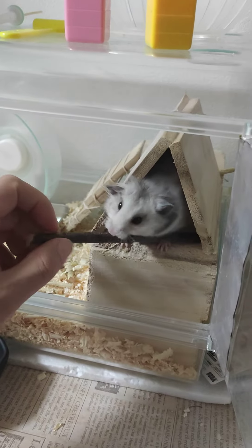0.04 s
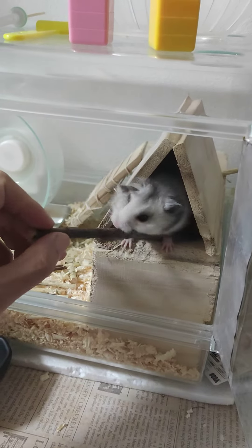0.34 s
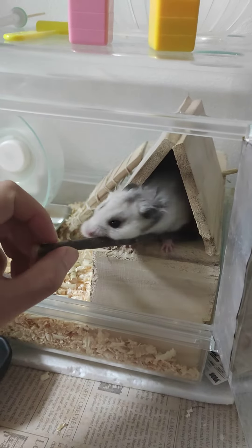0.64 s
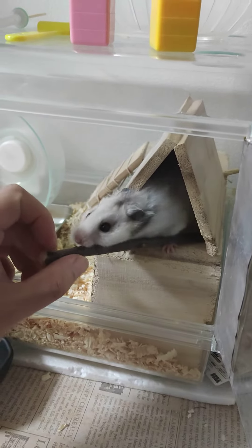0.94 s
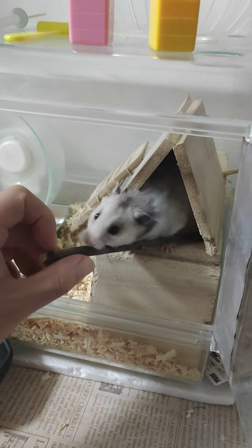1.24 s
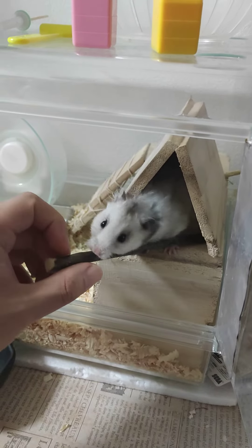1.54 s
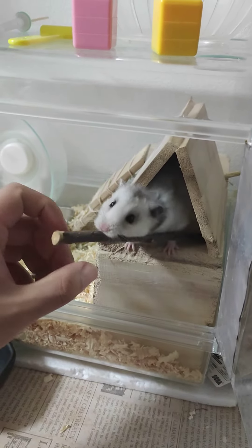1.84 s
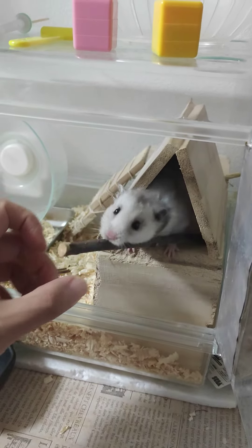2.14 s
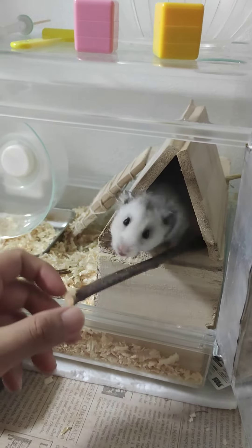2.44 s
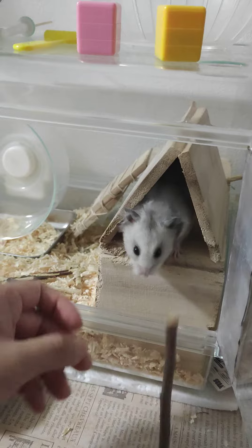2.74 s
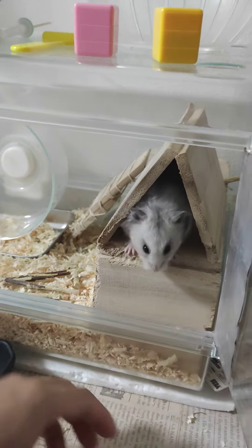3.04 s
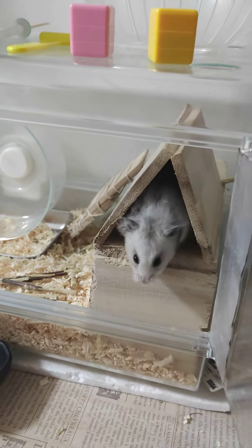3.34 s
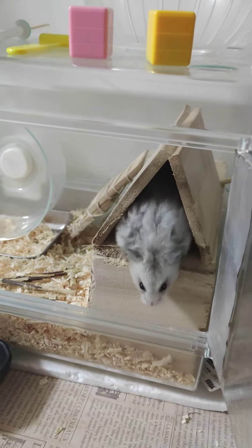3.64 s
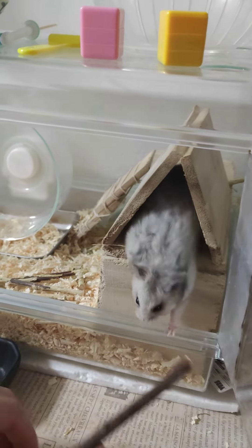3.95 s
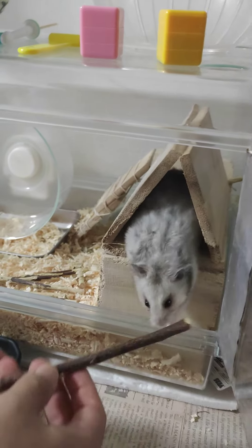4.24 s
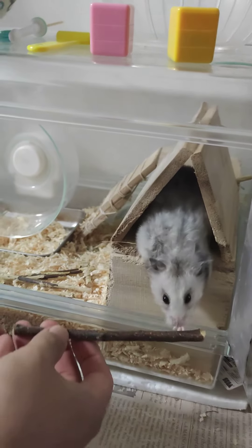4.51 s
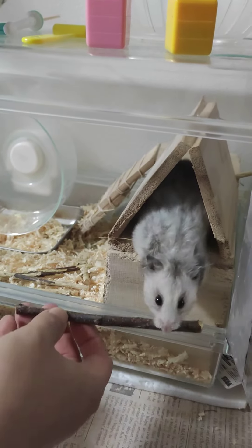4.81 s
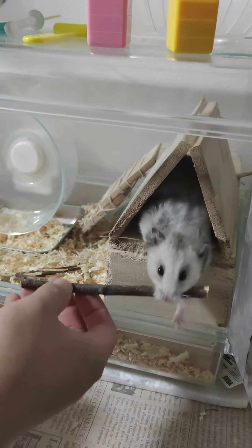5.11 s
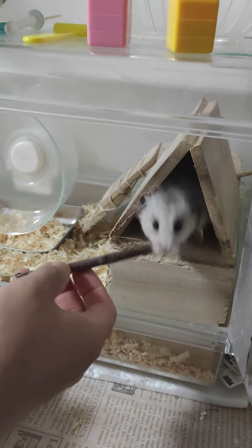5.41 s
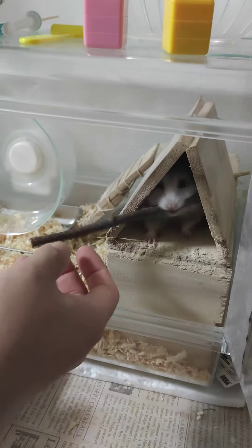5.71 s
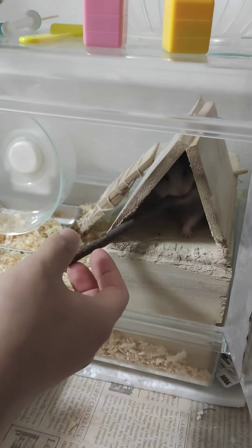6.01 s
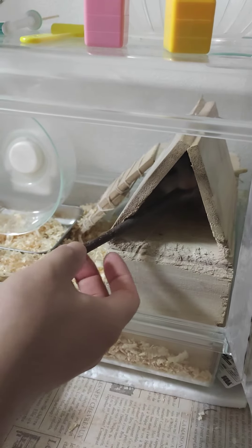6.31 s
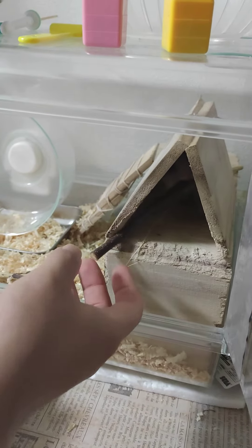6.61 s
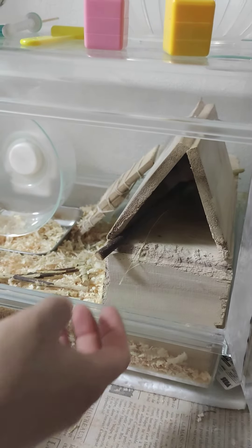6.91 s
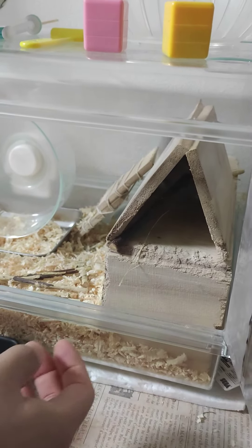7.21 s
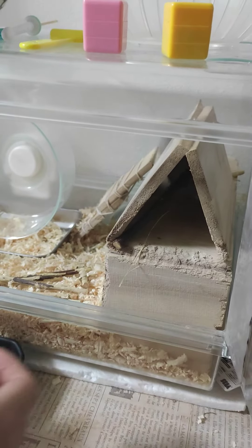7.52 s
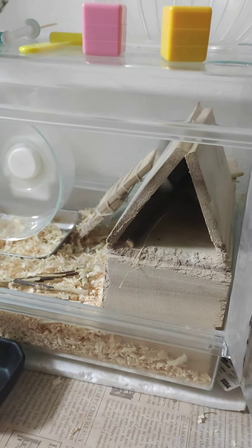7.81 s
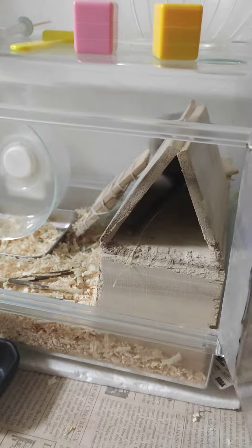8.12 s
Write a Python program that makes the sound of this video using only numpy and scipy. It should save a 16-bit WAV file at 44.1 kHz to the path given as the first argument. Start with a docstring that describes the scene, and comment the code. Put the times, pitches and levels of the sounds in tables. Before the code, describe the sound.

In a quiet room, a small stick clatters onto paper, then scrapes and bumps softly as a hamster pulls it over wood.

```python
"""A hamster and a twig

In a quiet room, close to a phone, a hand offers a twig to a hamster in a plastic cage. The twig drops
onto newspaper, ringing and slapping the paper as it bounces, then rolls to rest. The hamster drags it
into its wooden hut: bark catches and slips, and the boards hum and knock. Claws tick, shavings rustle,
and near the end a finger swishes over the phone's case."""
import sys
import numpy as np
from scipy import signal
from scipy.fft import rfft, irfft
from scipy.io import wavfile
from scipy.ndimage import uniform_filter1d

SR = 44100
rng = np.random.default_rng(int(sys.argv[2]) if len(sys.argv) > 2 else 0)


def to_wav(s):
    """Save 16-bit WAV."""
    ch = np.atleast_2d(s).T  # columns
    pcm = np.round(np.clip(ch, -1, 1) * 32767)  # PCM
    wavfile.write(sys.argv[1], SR, pcm.astype(np.int16))


N = 359856
HIT_SIZE = 16384  # samples set aside for one hit

# The twig's landings: t/s, level/dB, hardness/(dB per octave), bending/dB, floor thud/dB, ring/dB,
# contact spot along the twig (0-1), paper snap/dB. Hard ones are brighter; flat ones bend the twig.
BOUNCES = [(2.788, -11.5, 4, 11, -4, -16, 0.2, -28), (2.7944, -8, 1.7, 2, 3, -10, 0, -26),
           (2.802, -20.5, -1.5, -5, -3, -34, 0, -50), (2.8795, -15.5, -2, 2.5, -2.5, -26.5, 0.05, -37),
           (2.9291, -24, -5, 4.5, -6, -36, 0.18, -45), (3.1085, -9.5, -1.5, -11, -0.5, -20, 0.13, -29),
           (3.2005, -28.5, 0, -1.5, 1, -22.5, .305, -55), (3.299, -10, 2.5, 0, 5.5, -32, 0.36, -31),
           (3.341, -29.5, 4.5, 7, 13, -40, 0.2, -51), (3.3955, -23, 0.4, 3.5, 7, -23, 0.11, -49),
           (3.4358, -31, -1.5, 0, 2, -36.5, 0.21, -52), (3.484, -32, 0.5, -7, 5, -40, 0.1, -48),
           (3.505, -32.5, -5, 0, -3, -48, 0.4, -47), (3.539, -33.5, -6, -6, -5.5, -51, 0.35, -51),
           (3.545, -33, -4.5, 0, -4, -52, 0.2, -66), (3.573, -39.5, -3.5, 0, -2, -51, 0.4, -60),
           (3.595, -39.5, -7.5, -5, -8.5, -39, .17, -62), (3.631, -50, -7.5, -5, 0, -58, 0.2, -70),
           (3.664, -50.5, -5.5, 1, -1, -57, .17, -74)]
# The hamster's pulls: t/s, length/s, scrape/dB, hut rumble/dB, rasp f/Hz
PULLS = [(5.685, 0.08, -53, -57, 1190), (5.804, 0.033, -54, -56, 1250), (5.983, 0.055, -55, -56, 950),
         (6.04, 0.14, -50.5, -54, 800), (6.231, 0.16, -59.5, -58, 840), (6.56, 0.17, -56, -54.5, 770),
         (7.074, 0.16, -58.5, -61.5, 1044)]
HUT_MODES = [(150, 25, 6), (218, 27, 9.5), (318, 35, 10), (695, 55, 15), (765, 70, 11), (990, 50, 14),
             (1063, 60, 7.4), (2045, 68, 4.3), (2220, 280, 7.5), (4560, 600, 4.7), (8140, 840, 6.3)]  # pitches the hut rings at: f/Hz, width/Hz, boost/dB
TICK_COLOUR = [(300, -21), (1200, -7.5), (2400, -6), (4000, -6.5), (8000, -9), (11500, -19.5),
               (14000, -15.5)]  # tone of a small dry tick: f/Hz, level/dB
TICK_EDGES = [1500, 3300, 7500, 15500]  # borders of its clack, crack and fizz bands: f/Hz
# Left-right balance of sounds from the floor and from the cage: f/Hz, left minus right/dB
FLOOR_PAN = [(300, 0.5), (800, 3), (1400, 2), (2300, 10), (4500, -0.5), (9000, 4), (14000, 0)]
CAGE_PAN = [(60, 3), (110, -2), (200, 2.5), (380, -3), (700, 5), (1290, -7), (2380, 8), (4400, 0),
            (8120, 1), (15000, -0.5)]


def undb(db):
    """Turn decibels into a gain."""
    return 10 ** (np.asarray(db) / 20)


def unit(x):
    """Scale to an average strength (rms) of 1."""
    return x / np.sqrt(np.mean(x ** 2))


def mid_unit(x):
    """Scale a stereo pair so that its middle has rms 1."""
    return x / np.sqrt(np.mean(x.mean(0) ** 2))


def bins(size):
    """Frequencies in the spectrum of that many samples."""
    return np.maximum(np.fft.rfftfreq(size, 1 / SR), 1)


def over_hz(points, hz):
    """Read between (f/Hz, value) points, with octaves evenly spaced."""
    at, value = np.transpose(points)
    return np.interp(np.log(hz), np.log(at), value)


def colour(x, points, modes=()):
    """Give x a broad tone (f/Hz, level/dB) and modes, pitches that ring (f/Hz, width/Hz, boost/dB)."""
    size = x.shape[-1]
    hz = bins(size)
    peaks = 1 + sum((undb(db) ** 2 - 1) / (1 + (2 * (hz - f) / width) ** 2) for f, width, db in modes)
    log_gain = np.log(undb(over_hz(points, hz))) + np.log(np.maximum(peaks, .1)) / 2
    cepstrum = irfft(log_gain, size)
    cepstrum[1:size // 2] *= 2  # this folding puts the ringing after each push, not before
    cepstrum[size // 2 + 1:] = 0
    return irfft(rfft(x) * np.exp(rfft(cepstrum)), size)


def stereo(pair, pan, side=None):
    """Two unrelated signals become left and right; by default alike in the bass, apart in the treble."""
    near_side = [(120, -14), (300, -17.5), (600, -7), (1100, -2), (12000, 0)]  # stereo width of close sounds: f/Hz, side minus mid/dB
    size = pair.shape[-1]
    hz, sign = bins(size), np.array([[1], [-1]])
    mid, diff = rfft(pair)
    width = undb(over_hz(near_side if side is None else side, hz))
    return irfft((mid + sign * diff * width) * undb(sign * over_hz(pan, hz) / 2), size)


def lagged(pair, lag_s):
    """A sound from one side reaches the left microphone that much later than the right."""
    size = pair.shape[-1]
    return irfft(rfft(pair) * np.exp(-1j * np.pi * bins(size) * lag_s * np.array([[1], [-1]])), size)


def fading(t60s, size):
    """Dense echoes as two noises, each band dying at its own rate (f/Hz, time to fall 60 dB/s)."""
    t, hz = np.arange(size) / SR, bins(size)
    noise, out = rfft(rng.standard_normal((2, size))), 0
    centres = np.geomspace(100, 14000, 8)
    for centre, share in zip(centres, np.eye(len(centres))):
        band = irfft(noise * np.interp(np.log(hz), np.log(centres), share), size)
        envelope = np.exp(-np.log(1000) * t / over_hz(t60s, centre))
        out = out + band * envelope / np.linalg.norm(envelope)
    return out


def room(x, wet_db, delay_s=0.011):
    """Add the echo of the small room, whose furnishings soak up the highest treble."""
    ring_times = [(100, 0.29), (300, 0.33), (800, 0.19), (2200, 0.34), (5000, 0.1), (14000, 0.23)]  # the room's ring: f/Hz, time to fall 60 dB/s
    tail = np.pad(fading(ring_times, HIT_SIZE), ((0, 0), (int(delay_s * SR), 0)))
    tail = stereo(tail, [(100, 0.0095)])
    tail = colour(tail, [(200, -0.5), (700, -0.5), (2500, -3), (8000, -2.5), (13000, -12.5)])
    return x + undb(wet_db) * signal.fftconvolve(x, tail, axes=1)[:, :N]


def tilted(tone_db, edges, hardness, pivot_hz):
    """Band levels of one contact: the harder it is, the more they lean to the treble."""
    centres = np.sqrt(np.multiply(edges[:-1], edges[1:]))
    return np.array(tone_db) + hardness * np.log2(centres / pivot_hz)


def voiced(hit, edges, bands_db):
    """Nudge each band of a hit towards its level, counting its energy as spread over 10 ms."""
    hz = bins(HIT_SIZE)
    for _ in range(2):
        power = abs(rfft(hit.mean(0))) ** 2 * 2 / HIT_SIZE / (SR / 100)
        tone = [(np.sqrt(lo * hi), db - 10 * np.log10(power[(hz >= lo) & (hz < hi)].sum()))
                for lo, hi, db in zip(edges, edges[1:], bands_db)]
        hit = colour(hit, tone)
    return hit


def blows(table, edges, body, modes, pan, t60s, gain_db, scatter_db, attack_s,
          echo=0.8, lengthen=0, shift=0):
    """Each blow (t/s, level/dB, band levels/dB) rattles briefly and makes the body ring."""
    out, hz = np.zeros((2, N + HIT_SIZE)), bins(HIT_SIZE)
    loudest_db = max(row[1] for row in table)
    for s, level_db, bands_db in table:
        linger = undb(lengthen * (level_db - loudest_db))  # lighter blows can die sooner
        rattle = fading([(f, t60 * linger) for f, t60 in t60s], size=4096)
        rattle *= 1 - np.exp(-np.arange(4096) / (SR * attack_s))  # the soft surface gives way first
        burst = rfft(rattle, HIT_SIZE)
        # a contact pushes all pitches evenly: level the spectrum over 180 Hz spans
        burst /= np.sqrt(uniform_filter1d(abs(burst) ** 2, int(180 * HIT_SIZE / SR)))
        lag_s = rng.uniform(.0007, .0016)  # a nearby surface reflects the treble
        burst *= 1 + echo * hz / (hz + 1500) * np.exp(-2j * np.pi * hz * lag_s)
        # each spot favours other modes and can shift their pitch
        struck = [(f * (1 + shift * rng.standard_normal()), width,
                   db + scatter_db * rng.standard_normal()) for f, width, db in modes]
        hit = stereo(colour(irfft(burst), body, struck), pan)
        hit = voiced(hit, edges, bands_db)
        start = int(s * SR)
        out[:, start:start + HIT_SIZE // 2] += undb(level_db + gain_db) * hit[:, :HIT_SIZE // 2]
    return out[:, :N]


def friction(slips_per_s, spread_db, hiss_db, t60_s):
    """Rubbing: tiny uneven slips, each with a short patter of echoes, over a smooth hiss."""
    slipping = rng.random(N) < slips_per_s / SR
    sizes = undb(spread_db * np.minimum(rng.exponential(size=N), 4))
    slips = slipping * sizes * rng.choice([-1, 1], N)
    patter = signal.fftconvolve(slips[None], fading([(100, t60_s)], size=4096), axes=1)[:, :N]
    return unit(patter) + undb(hiss_db) * unit(rng.standard_normal((2, N)))


def texture(noise, tone, pan, modes=()):
    """Colour a noise, place it in stereo and scale its middle to rms 1."""
    return mid_unit(stereo(colour(noise, tone, modes), pan))


def strokes(table, attack_s, release_s, build_db=0, level_column=2):
    """Gain over time of strokes (t/s, length/s, level/dB): each takes hold, builds and dies away."""
    t, gain = np.arange(N) / SR, np.zeros(N)
    for row in table:
        since, length = np.maximum(t - row[0], 0), row[1]
        shape = (1 - np.exp(-since / attack_s)) * np.exp(-np.maximum(since - length, 0) / release_s)
        gain += shape * undb(row[level_column] - build_db * np.maximum(1 - since / length, 0))
    return gain


def air():
    """The room's steady low murmur, arriving from the right, and the microphones' hiss."""
    tone = [(8.8, -33), (15, 3), (141, -9), (173, -16.5), (195, -13.5), (284, -18), (329, -16),
            (391, -21.5), (555, -17), (937, -24), (1410, -25.5), (1730, -28.5), (5220, -40), (9630, -46),
            (15800, -42.5)]  # murmur and hiss: f/Hz, level/dB
    pan = [(60, -2), (110, -1), (200, -1.7), (380, -1), (700, -1.6), (1290, -0.5), (2380, 3), (4400, -0.1),
           (8120, 0.0), (15000, 0.3)]  # balance: f/Hz, left minus right/dB
    side = [(60, -0.5), (110, -5.5), (200, -5.5), (380, -7), (700, -4.5), (1400, -2.5), (2380, -.5),
            (15000, 0.5)]  # stereo width: f/Hz, side minus mid/dB
    hums = [(170, 12, 6.8), (198.6, 19, 4.1), (356, 62, 7.3), (620, 13, 1.4)]
    murmur = colour(rng.standard_normal((2, N)), tone, hums)
    return undb(-58.5) * mid_unit(lagged(stereo(murmur, pan, side), lag_s=0.00033))


def finger():
    """Skin swishes over the phone; the case rings as it slows, rumbles under the grip and clicks once."""
    slides = [(7.567, 0.067, -65.5)]  # the finger slides: t/s, length/s, level/dB
    grips = [(7.58, 0.31, -65.5), (7.9, 0.13, -63)]  # the grip shifts: t/s, length/s, level/dB
    clicks = [(7.9139, -41, [-21, -28, -9.5])]  # the case clicks: t/s, level/dB, [clack, crack, fizz]/dB
    skin_tone = [(150, -11), (300, -1.5), (600, -2.5), (1400, -4.5), (2300, -8.5), (4700, -11.5),
                 (6500, -18), (10500, -26.5), (13500, -17), (15800, -13)]  # sliding skin: f/Hz, level/dB
    pan = [(60, -1), (110, -2), (200, -3), (380, -1), (700, 6), (1290, -6.5), (2380, 2), (4400, -1),
           (8120, -4), (15000, 1.5)]  # balance: f/Hz, left minus right/dB
    # pitches of the case and of the gripping finger's squeak: f/Hz, width/Hz, boost/dB
    case_modes = [(7980, 300, 37), (13300, 500, 17), (14700, 500, 15)]
    squeak_modes = [(2890, 200, 28), (4500, 800, 7)]
    ring_tone = [(300, 8), (2500, -20), (8000, -8), (11000, -23), (14000, -11)]
    rumble_tone = [(40, -44), (80, 2.5), (160, -12), (300, 2.5), (500, -18), (1200, -25), (4000, -52)]
    rub = friction(slips_per_s=900, spread_db=2.5, hiss_db=-2, t60_s=0.017)
    swish = texture(rub, skin_tone, pan)
    ring = texture(rub, ring_tone, pan, case_modes)
    rumble = texture(rub, rumble_tone, pan)
    squeak = texture(rub, [(600, -18), (2500, 4), (5000, -6), (8000, -22)], pan, squeak_modes)
    click = blows(clicks, TICK_EDGES, TICK_COLOUR, [(14000, 500, 15)], pan,
                  t60s=[(1500, 0.013), (13000, 0.013)], gain_db=-5.5, scatter_db=6, attack_s=.0005)
    slide = strokes(slides, attack_s=0.013, release_s=0.076)
    slowing = strokes([(s + 0.045, length, db) for s, length, db in slides],
                      attack_s=0.047, release_s=.11)
    grip = strokes(grips, attack_s=0.013, release_s=0.068)
    swish *= undb(4) * slide + undb(-6.5) * grip
    return swish + ring * slowing + (rumble + undb(-17) * squeak) * grip + click


def ticks():
    """Claws, bark and fingernails make small dry ticks, each with a pitch of its own."""
    taps = [(0.2543, -51.5, -5.5, 2450), (1.049, -53, -4, 2460), (1.0974, -54, -5, 1980),
            (1.4475, -52.5, -8, 1900), (2.185, -72.5, 23.5, 7840), (2.5004, -52, -5, 2430),
            (2.954, -61, 9, 9550), (3.087, -59.5, 6.5, 6100), (4.108, -68.5, 17.5, 7620),
            (7.9956, -51, 4, 3700)]  # the ticks: t/s, level/dB, hardness/(dB per octave), f/Hz
    tone_db = [-10.5, -12, -15.5]  # an ordinary tick's clack, crack and fizz: level/dB
    nip_modes = [(1890, 200, 13.5), (3150, 680, 10), (7800, 590, 13)]  # ring of the nipped twig: f/Hz, width/Hz, boost/dB
    out = 0
    for s, db, hardness, hz in taps:
        contact = (s, db, tilted(tone_db, TICK_EDGES, hardness, pivot_hz=3900))
        out += blows([contact], TICK_EDGES, TICK_COLOUR, nip_modes + [(hz, 69, 23.5)], CAGE_PAN,
                     t60s=[(1500, 0.039), (5000, 0.079), (13000, 0.041)],
                     gain_db=-6, scatter_db=4.5, attack_s=0.00075)
    return out


def rustling():
    """Shavings crackle in little bursts, and the newspaper crinkles under the hand and the twig."""
    rustles = [(0.235, 0.041, -69.5), (0.345, 0.011, -66.5), (1.045, 0.018, -59), (1.17, 0.064, -73),
               (1.8, 0.036, -70), (2.11, 0.087, -67.5), (2.25, 0.027, -66), (2.292, 0.037, -67),
               (2.338, 0.012, -66), (2.55, 0.32, -76.5), (3.755, 0.015, -67.5), (4.1, 0.062, -75),
               (6.895, 0.03, -76)]  # fur, shavings and sleeve stir: t/s, length/s, level/dB
    crinkles = [(3.025, 0.11, -57), (3.2, 0.09, -57), (3.31, 0.024, -44), (3.5, 0.1, -59)]  # the paper is pressed: t/s, length/s, level/dB
    shavings_tone = [(400, -13), (1500, -6.5), (2500, 7), (3800, -2.5), (5500, -2), (8000, -1),
                     (11000, -10.5), (15000, -17)]  # crackling shavings: f/Hz, level/dB
    paper_tone = [(1000, -2), (4000, 0.5), (8000, 0.5), (11500, -14.5), (14000, -11)]
    flakes = friction(slips_per_s=380, spread_db=3, hiss_db=-8, t60_s=.012)
    steps = np.arange(N) * 70 / SR  # the level flickers 70 times a second
    flakes *= undb(2.4 * np.interp(steps, np.arange(1000), rng.standard_normal(1000)))
    crackle = texture(flakes, shavings_tone, CAGE_PAN)
    crackle *= strokes(rustles, attack_s=0.0037, release_s=0.012)
    paper = texture(flakes, paper_tone, FLOOR_PAN) * strokes(crinkles, attack_s=.018, release_s=0.027)
    return crackle + undb(-9) * paper


def hut_knocks():
    """The twig catches on the hut and knocks its boards, which ring briefly."""
    knocks = [(1.197, -51, -7), (2.553, -46, -5), (2.609, -46.5, -10), (5.6699, -37, -3),
              (5.742, -45.5, -2), (5.766, -44, -2.5), (5.782, -41.5, -1.5), (5.848, -32, -0.9),
              (5.859, -39.5, -5), (5.87, -45.5, -5), (6.028, -47.5, -1), (6.047, -42, -4),
              (6.072, -38, -3.5), (6.099, -38, -4.5), (6.13, -40.5, -7), (6.151, -38, -3.5),
              (6.16, -41.5, -3.5), (6.249, -55, -3), (6.288, -46.5, -8.5), (6.365, -56, -2.5),
              (6.503, -49, -0.5), (6.52, -53.5, -11.5), (6.58, -50, -4.5), (6.629, -49, -5),
              (6.662, -50, -5), (6.697, -44, -5.5), (6.715, -51, -2), (6.75, -47.5, -6.5),
              (8.002, -42.5, -3)]  # the knocks: t/s, level/dB, hardness/(dB per octave)
    edges = [150, 550, 1500, 3300, 15500]  # borders of the thud, board, clack and crack bands: f/Hz
    tone_db = [-15, -8.5, -17, -18.5]  # an ordinary knock in those bands: level/dB
    wood_tone = [(60, -15), (160, -11), (500, -3.5), (900, 0), (1300, -2), (1750, -3), (2700, -4.5),
                 (3800, -17.5), (8000, -31.5), (15000, -43.5)]  # struck boards: f/Hz, level/dB
    out = 0
    for s, db, hardness in knocks:
        contact = (s, db, tilted(tone_db, edges, hardness, pivot_hz=900))
        hz = min(PULLS, key=lambda pull: abs(pull[0] - s))[-1]  # pitch of the nearest pull
        out += blows([contact], edges, wood_tone, HUT_MODES + [(hz, 450, 7)], CAGE_PAN,
                     t60s=[(200, .06), (900, 0.052), (3000, 0.046), (10000, 0.046)],
                     gain_db=-3, scatter_db=1, attack_s=0.0018)
    return out


def catches(per_s=46, sink_db=4.5):
    """Bark sticks and slips unevenly: the rubbing leaps up at each slip and sinks until the next."""
    slips = np.cumsum(rng.gamma(4, 1 / 4, 1000)) / per_s
    phase = np.interp(np.arange(N) / SR, slips, np.arange(len(slips))) % 1
    return undb(-sink_db * phase)


def dragged_twig():
    """Bark scrapes the boards and the hut hums; each pull builds as the hamster leans back."""
    light_rub = [(5.68, 1.88, -73.5)]  # faint rubbing through the whole drag: t/s, length/s, level/dB
    scrape_tone = [(200, -36.5), (400, -19), (600, 1.5), (1150, -5.5), (1600, -13), (2300, -5), (3200, -12),
                   (5000, -13.5), (8000, -20), (11000, -30), (15500, -30)]  # rubbed boards: f/Hz, level/dB
    rumble_tone = [(50, -23), (145, 14.5), (320, 12), (500, -10), (900, -35), (3000, -65)]  # the hut's floor: f/Hz, level/dB
    attack_s, release_s, build_db = 0.0075, 0.023, 4
    grain = friction(slips_per_s=1300, spread_db=2.5, hiss_db=-5, t60_s=.025) * catches()
    scrape = 0
    for pull in PULLS:
        # each pull rubs another part of the boards, so their pitches shift
        boards = [(hz * 2 ** (.035 * rng.standard_normal()), width, db) for hz, width, db in HUT_MODES]
        rasp = colour(grain, scrape_tone, boards + [(pull[-1], 290, 5)])  # the contact rings broadly
        scrape += unit(rasp) * strokes([pull], attack_s, release_s, build_db)
    rub = colour(grain, scrape_tone, [(2040, 1100, 7.3)])  # too weak to ring the hut
    scrape += unit(rub) * strokes(light_rub, attack_s, release_s)
    rumble = texture(grain, rumble_tone, CAGE_PAN, HUT_MODES)
    rumble *= strokes(PULLS, attack_s, release_s, build_db, level_column=3)
    return undb(-4) * stereo(scrape, CAGE_PAN) + undb(-5.5) * rumble


def paper_snaps(t60_s=0.0053):
    """The paper slaps the floor at each bounce: a very short, bright crack."""
    snap_tone = [(1500, -18), (3500, -2), (6000, -1), (8600, -6.5), (9600, 2), (11300, -14), (14000, -6),
                 (15800, -17)]  # slapping paper: f/Hz, level/dB
    t, gain = np.arange(N) / SR, np.zeros(N)
    for s, *_, snap_db in BOUNCES:
        gain += undb(snap_db) * (t >= s) * np.exp(-np.log(1000) * np.maximum(t - s, 0) / t60_s)
    return undb(-9.5) * gain * texture(rng.standard_normal((2, N)), snap_tone, FLOOR_PAN)


def twig_ring():
    """Each bounce sets the twig ringing; a mode struck where it does not move stays silent."""
    # the twig's ways of bending: f/Hz, half waves along its length, level/dB, time to fall 60 dB/s
    bending_modes = [(2530, 3, -1.5, 0.031), (3820, 4, -15, 0.021), (4960, 5, -11.5, 0.012),
                     (6120, 6, -15.5, .024), (9550, 8, -16.5, 0.014)]
    out, t = np.zeros((2, N)), np.arange(HIT_SIZE) / SR
    sign = np.array([[1], [-1]])
    for s, *_, ring_db, spot, _ in BOUNCES:
        start = int(s * SR)
        for hz, half_waves, db, t60 in bending_modes:
            detune = 1 + .014 * rng.standard_normal()
            wave = np.sin(2 * np.pi * hz * detune * t + sign * np.pi / 4)
            wave *= undb(sign * over_hz(FLOOR_PAN, hz) / 2)
            envelope = (1 - np.exp(-t / 0.00077)) * np.exp(-np.log(1000) * t / t60)
            strength = undb(ring_db + db) * np.cos(np.pi * half_waves * spot)
            out[:, start:start + HIT_SIZE] += strength * envelope * wave
    return out


def falling_twig():
    """The twig clatters on paper over a hard floor, then rolls on its knots."""
    # borders of the thud, knock, bending, clack, crack, snap and paper fizz bands: f/Hz
    edges = [100, 500, 1100, 1600, 3300, 4600, 7500, 15500]
    tone_db = [-16.5, -15, -17.5, -12, -26.5, -34.5, -39.5]  # an ordinary bounce in those bands: level/dB
    bending_share = [0.067, 0.049, 0.93, -.2, 0.31, 0.29, -0.13]  # share of a landing's bending that each band gains or loses
    twig_tone = [(40, -24), (110, -2.5), (210, -9.5), (290, 0.5), (380, 4), (520, -4.5), (800, 4),
                 (1300, -6), (1700, 0.5), (2700, 3), (3450, -6.5), (4100, -10), (5200, -14), (7000, -17.5),
                 (9600, -21.5), (11500, -33), (14000, -23), (15800, -37)]  # the struck twig: f/Hz, level/dB
    landing_modes = [(144, 18, 6), (298, 75, 10), (464, 30, 8), (648, 48, 14.5), (774, 30, 5.5),
                     (1016, 70, 2.5), (1140, 39, 2.5), (1386, 100, 5), (1585, 50, 3.5), (1692, 50, 5),
                     (1880, 70, 4), (1950, 90, 4.5), (2150, 35, 2), (2438, 50, 5.5), (2560, 90, 3.5),
                     (2730, 88, 3), (2980, 110, 7), (3450, 200, -7), (4354, 27, 7), (6130, 350, 5)]  # pitches that ring around each landing, lent mostly by the nearby surfaces: f/Hz, width/Hz, boost/dB
    rolls = [(2.8, 0.031, -42.5), (3.305, 0.03, -47.5), (3.42, 0.19, -50)]  # it skids, rolls and rocks to rest: t/s, length/s, level/dB
    landings = []
    for s, db, hardness, bend_db, thud_db, *_ in BOUNCES:
        bands_db = tilted(tone_db, edges, hardness, pivot_hz=1310) + bend_db * np.array(bending_share)
        bands_db[0] += thud_db
        landings.append((s, db, bands_db))
    hits = blows(landings, edges, twig_tone, landing_modes, FLOOR_PAN,
                 t60s=[(200, 0.058), (900, 0.041), (2400, 0.067), (5000, 0.022), (12000, 0.014)],
                 gain_db=-3, scatter_db=2, attack_s=0.0006, echo=0.7, lengthen=0.14, shift=.02)
    knots = friction(slips_per_s=130, spread_db=3, hiss_db=-8, t60_s=.03)
    roll_tone = [(60, -14), (140, -16), (300, 9), (800, 5), (2200, 0), (3700, -8.5), (5200, -20),
                 (6150, -10), (7000, -24), (14000, -31.5)]
    rolling = undb(-2.5) * texture(knots, roll_tone, FLOOR_PAN, landing_modes)
    rolling *= strokes(rolls, attack_s=0.0038, release_s=0.031)
    clatter = lagged(hits + paper_snaps() + rolling, lag_s=-0.00028)  # from the left
    return room(clatter, wet_db=-12, delay_s=0.014) + room(twig_ring(), wet_db=-20.5)


def scene():
    """Everything that reaches the phone, in stereo."""
    fall = falling_twig()
    drag = room(dragged_twig() + hut_knocks(), wet_db=-9.5)
    small_noises = room(ticks() + rustling(), wet_db=-18.5)
    return fall + drag + small_noises + finger() + air()


def record(dry):
    """The phone cuts the treble above 15850 Hz."""
    return signal.sosfilt(signal.ellip(10, .2, 70, 15850, fs=SR, output="sos"), dry)


dry = scene()
out = record(dry)
to_wav(out)
```